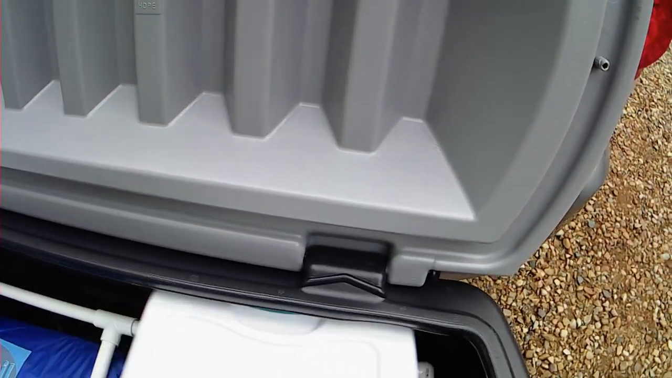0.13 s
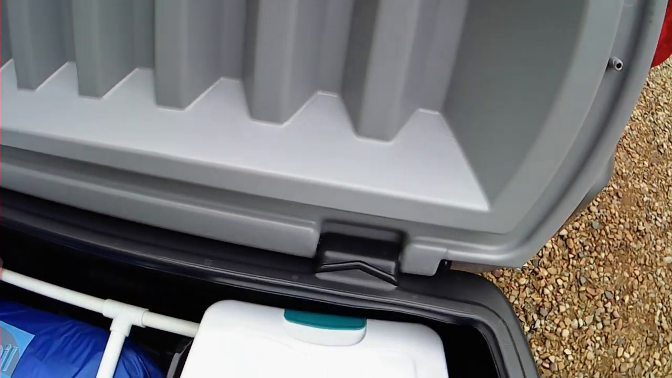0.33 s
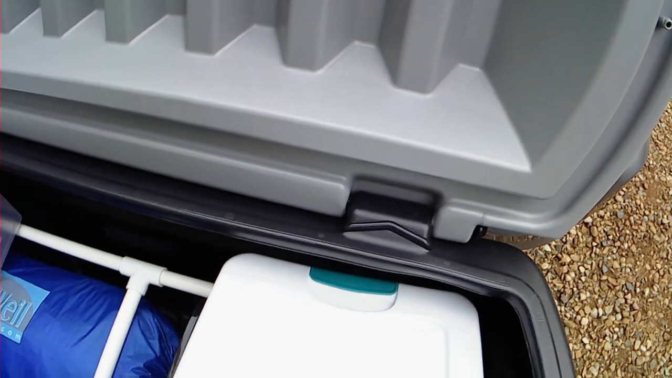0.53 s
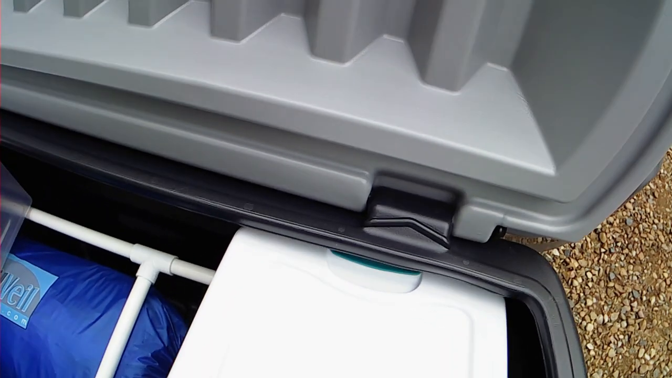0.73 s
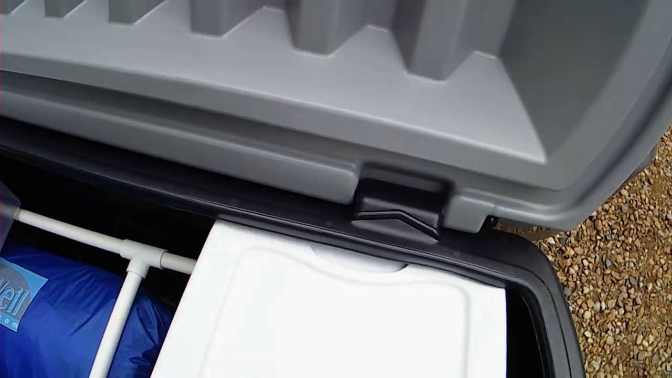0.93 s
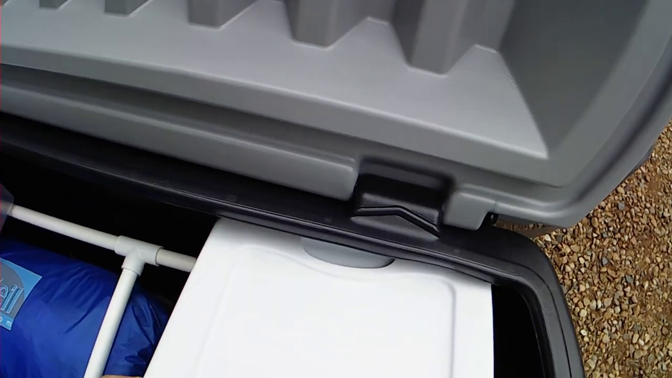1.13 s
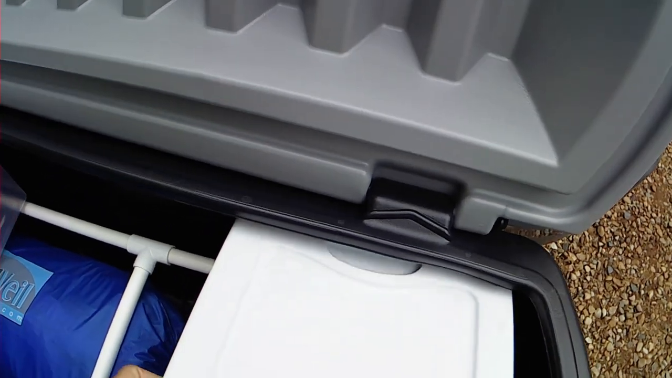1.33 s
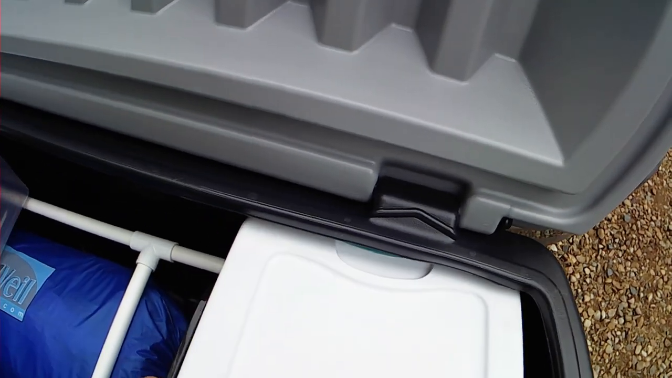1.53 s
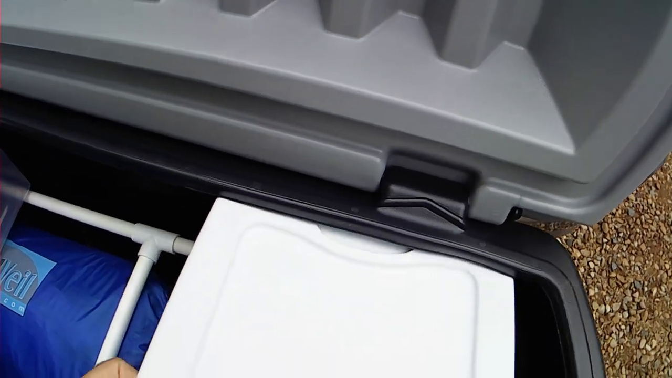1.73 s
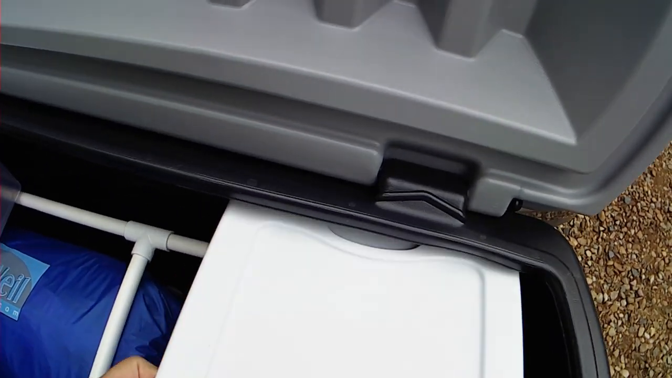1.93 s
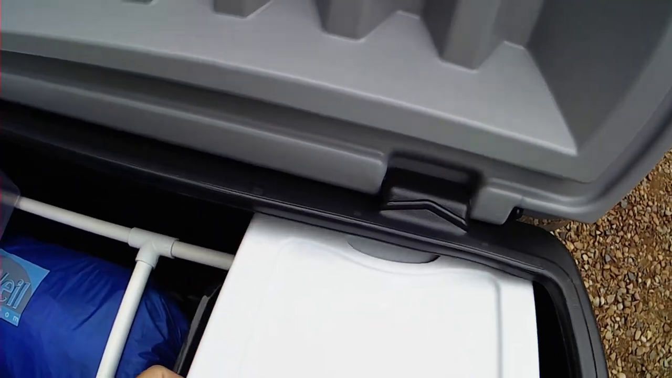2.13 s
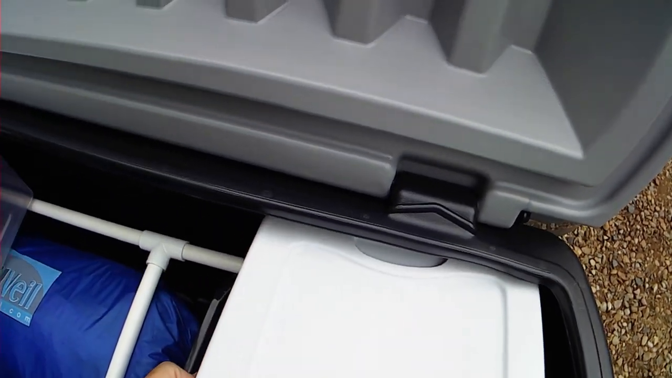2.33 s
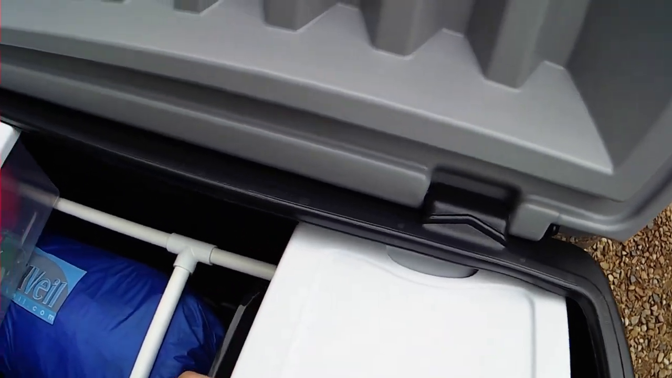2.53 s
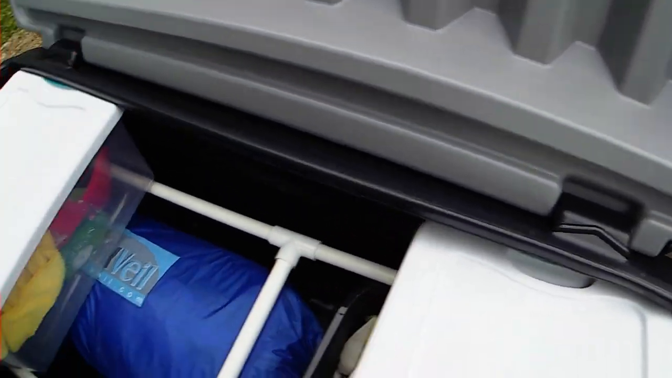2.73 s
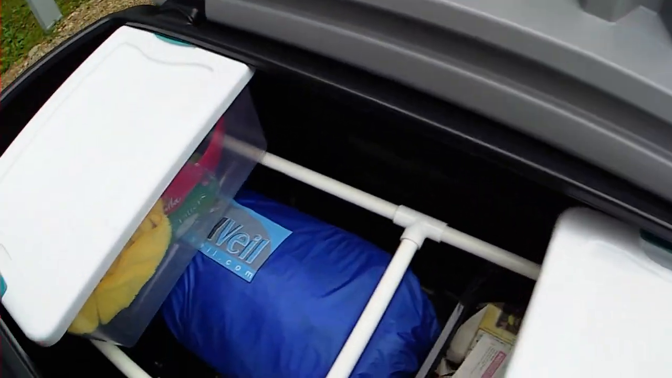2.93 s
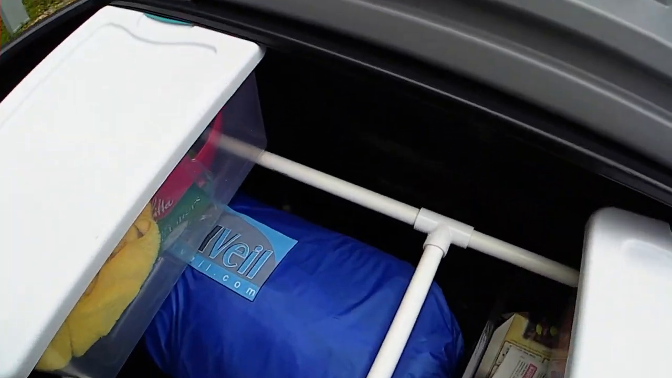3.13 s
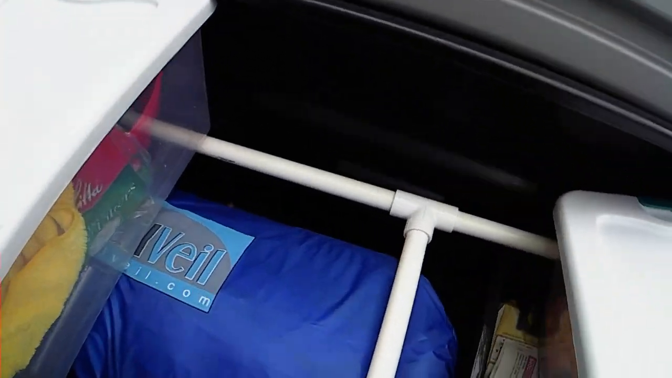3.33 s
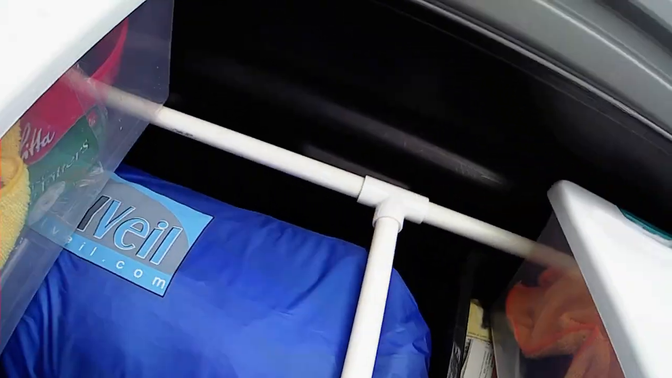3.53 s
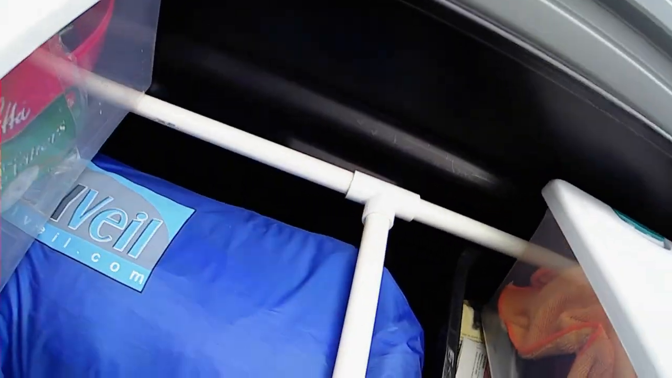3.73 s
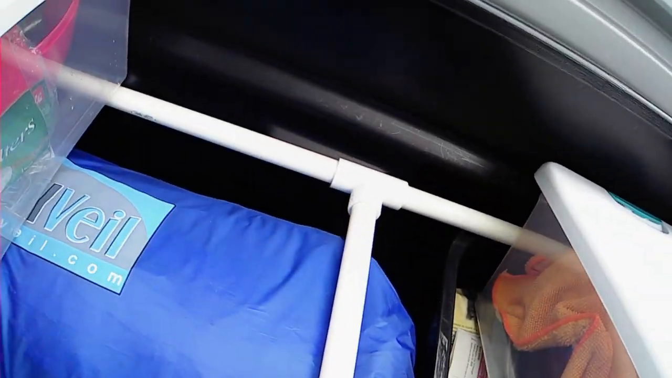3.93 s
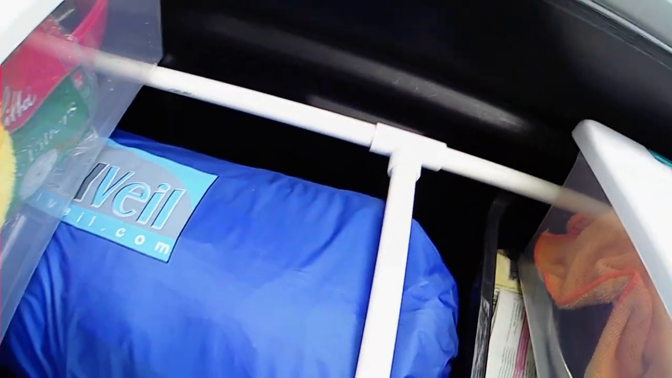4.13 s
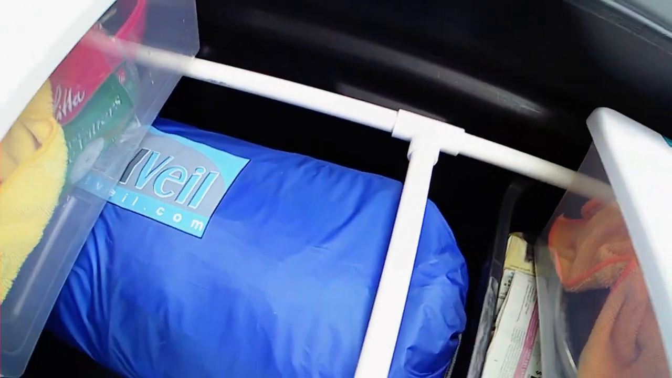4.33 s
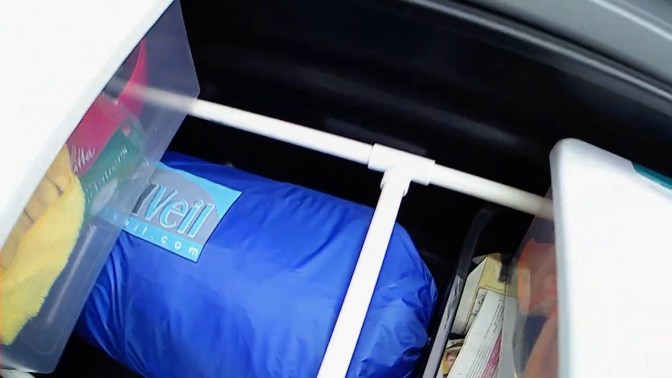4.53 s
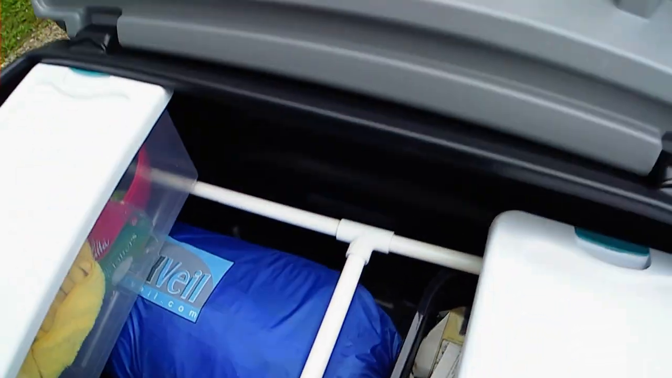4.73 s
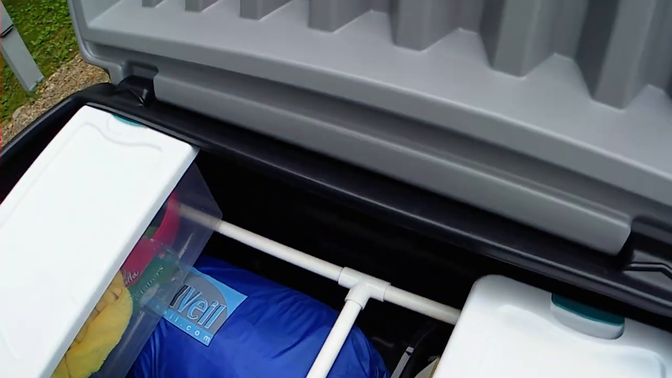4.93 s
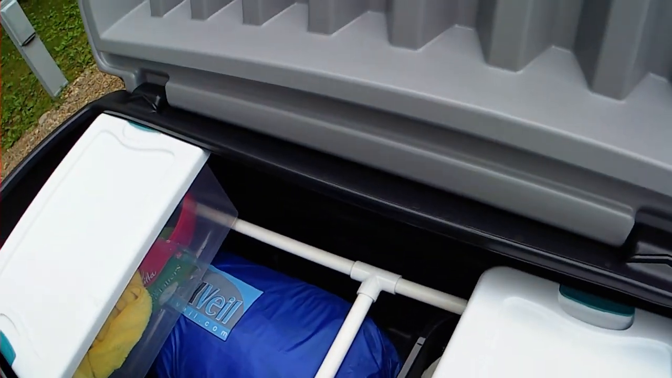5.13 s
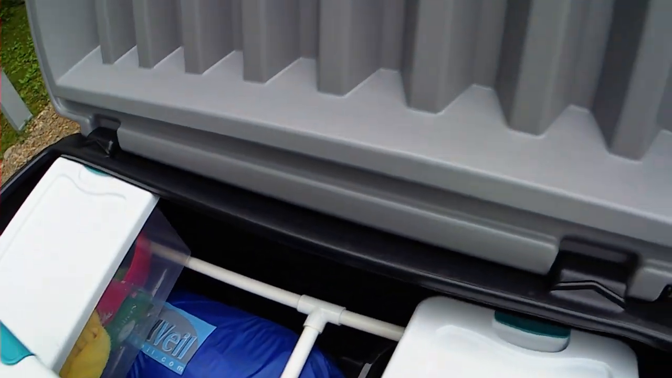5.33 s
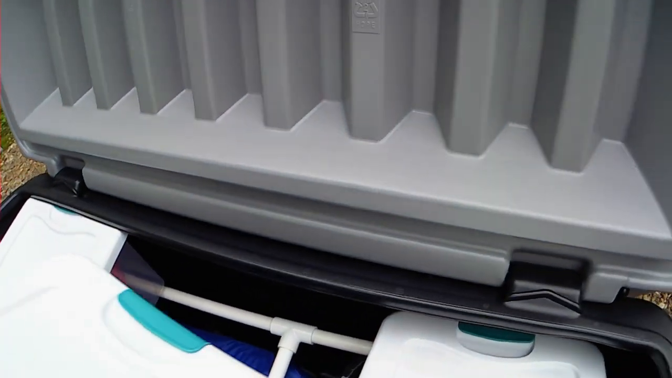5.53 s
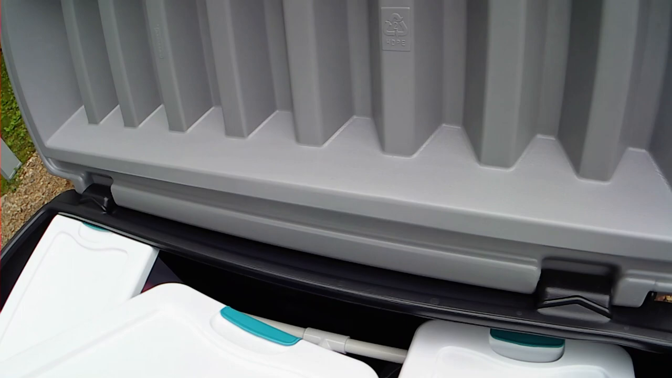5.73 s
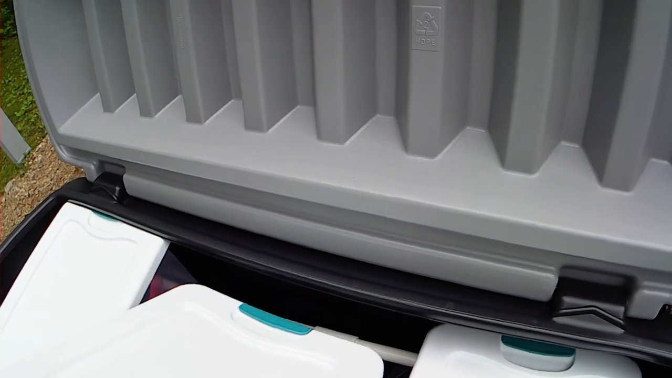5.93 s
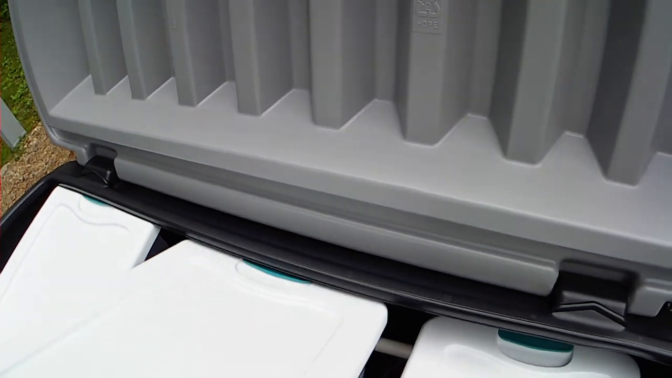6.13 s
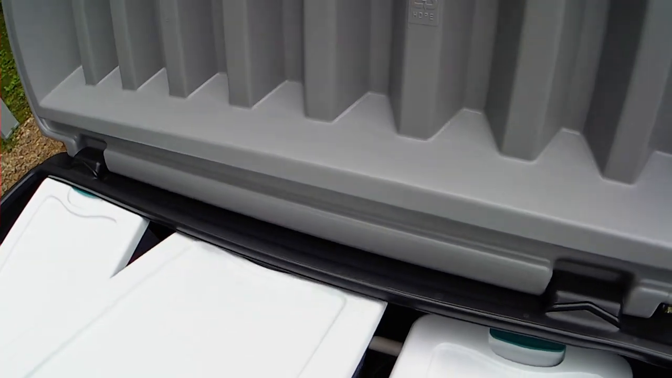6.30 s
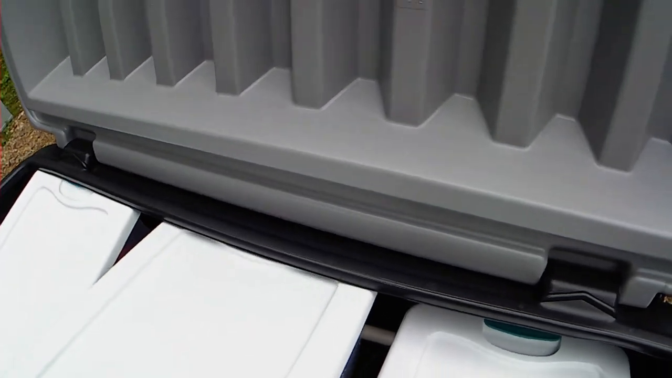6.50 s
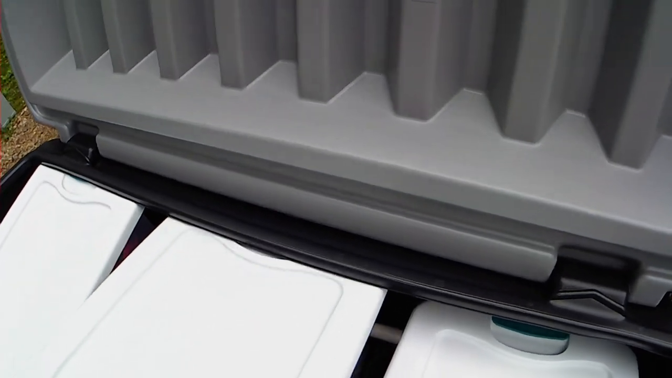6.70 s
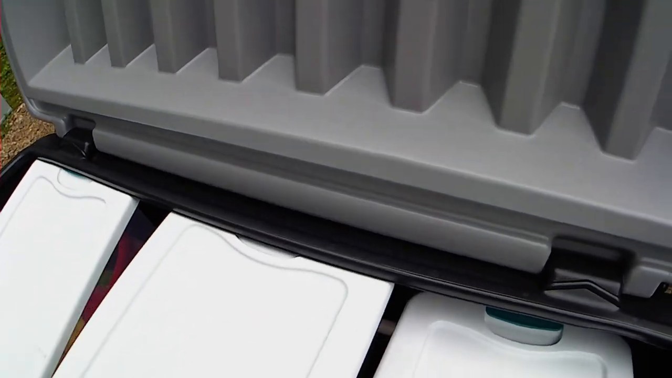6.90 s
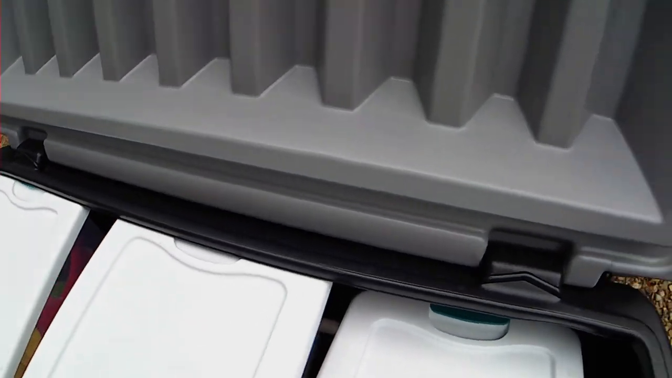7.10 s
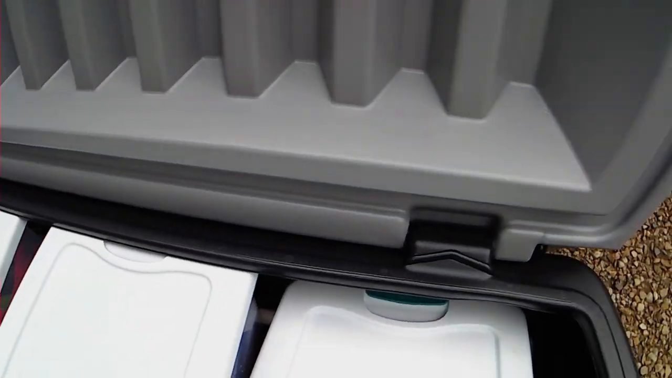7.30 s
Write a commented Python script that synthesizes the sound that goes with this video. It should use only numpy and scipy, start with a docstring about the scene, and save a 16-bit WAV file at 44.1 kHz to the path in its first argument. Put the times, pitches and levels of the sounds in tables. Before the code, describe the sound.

Outdoors, close to a small camera microphone, plastic totes are fitted into a big hollow plastic cargo box. From 0 to 0.5 s a busy tumble of heavy, boomy knocks, clacks and short rasps, strongest around 0.1-0.25 s. Another hard double thump lands at 0.85 s, with looser knocks until about 1.05 s. Small clacks at 1.35 and 1.7 s lead to a firm, damped thud at 1.8 s and softer bumps near 2 s with a tiny squeak. It is then nearly quiet until a brighter, ringing clatter with a rasp at 3.45-3.55 s, trailing into faint taps and rubbing by 4.3 s. Quiet air, low hiss and a barely audible thin high whine remain. At 5.9 s sliding and a brief squeal begin; moderate hollow knocks come at 6.2 and 6.4 s, then a quick cluster at 6.8-7 s, and a last light knock at 7.3 s.

```python
"""Outdoors, close to a small camera: plastic storage totes are slid and knocked into a big plastic cargo box.
Contacts clack in the thin walls and boom in the hollow shell: noise tails and decaying modes, coloured per contact.
Sliding is a stream of tiny slip impulses ringing the tote; filtered noise bursts rasp, rims ring, two squeals glide.
Behind lie quiet outdoor air (shaped noise) and the camera's faint pulsing whine (a sine and narrow noise)."""
import sys
import numpy as np
from scipy import signal
from scipy.fft import rfft, irfft, next_fast_len
from scipy.io import wavfile

SR = 44100
rng = np.random.default_rng(int(sys.argv[2]) if len(sys.argv) > 2 else 0)


def generate_wav(signal):
    """Clip the signal to [-1, 1] and save it as 16-bit WAV at the path in sys.argv[1]."""
    frames = np.transpose(np.atleast_2d(signal))
    scaled = np.clip(frames, -1, 1) * 32767
    pcm = np.round(scaled).astype(np.int16)
    wavfile.write(sys.argv[1], SR, pcm)


N = 324567

# contacts: (time [s], box thump in the attack [dB], wall clack in the attack before colour [dB],
# hardness [dB/octave], damping [dB], negative = none)
KNOCKS = [(0.012, -24, -54.5, 8, 10), (0.044, -26.5, -43, 0, -2), (0.109, -16, -35.5, -0.5, 4),
          (0.193, -21, -27, 2.5, -0.5), (0.211, -14.5, -33, 1.5, -5), (0.233, -26, -36.5, 0, 5),
          (0.245, -32, -43.5, 1.5, -1), (0.262, -31, -45, -0.5, 7), (0.286, -31, -44, -10, -1),
          (0.309, -42, -54, 6, 5), (0.328, -43, -50, -6, 4), (0.376, -37, -39.5, 0, 1.5),
          (0.443, -33, -52, -4, -2), (0.5059, -40, -30.5, 4.5, 5.5), (0.631, -50, -51.5, 0.5, 11),
          (0.807, -31, -56, 1, 6), (0.837, -17, -26.5, 3, 7.5), (0.862, -27, -32, 0, -9),
          (0.869, -14.5, -24.5, 1, 3), (0.889, -28.5, -40.5, -3.5, -2.5), (0.912, -34, -43, -2, 5),
          (0.937, -42, -51.5, 4, 9), (0.942, -26, -56, -7, 7), (0.985, -18.5, -29.5, -4.5, 15.5),
          (1.003, -28.5, -43, 0, 4), (1.021, -29.5, -47, -1, 0), (1.122, -49, -65.5, 6, -12),
          (1.344, -30, -38, 2, 2.5), (1.37, -34.5, -44.5, 3, 0.5), (1.532, -44, -68, 5, -3),
          (1.678, -28, -29.5, 0, 3.5), (1.7, -33, -34, 0, 3), (1.763, -35, -35.5, -7, 10),
          (1.786, -17, -26, 2.5, 10.5), (1.793, -18, -31.5, -8.5, 2), (1.805, -26, -43, -0.5, 1),
          (1.828, -29, -42, -1.5, -5), (1.951, -35.5, -44.5, -0.5, -4), (1.96, -21, -37.5, -4, 8.5),
          (1.998, -33, -42, 0.5, 3.5), (2.025, -32.5, -50, 2.5, -3.5), (2.043, -37, -60, 8, -4),
          (2.112, -57, -53.5, 1, 6), (2.616, -55, -62.5, 7.5, -10), (3.037, -56.5, -54.5, -3, 5),
          (3.278, -56, -45.5, 2, -5), (3.319, -29, -42, -1.5, -2.5), (3.426, -46, -46, 8, 6),
          (3.4374, -24, -28, 5.5, 1), (3.452, -22.5, -24, 2, -1), (3.459, -24.5, -22.5, 3, 3.5),
          (3.471, -19, -32.5, 2, 4), (3.486, -24.5, -33.5, 2.5, 2.5), (3.503, -38, -37, 0, 2),
          (3.533, -30, -37, -4, -2), (3.551, -33.5, -35.5, -3.5, 0), (3.635, -41, -52, 1.5, -4),
          (3.657, -42, -55, 0, 5), (3.711, -44, -50, -0.5, -5), (3.847, -52, -57, 0.5, 1),
          (4.045, -54, -56.5, -2.5, 10), (4.107, -62, -60, -5, 5), (4.128, -56, -54, -8, 6),
          (4.172, -55, -65, -5, -2), (4.229, -60, -52.5, -1, 0), (4.817, -76, -56.5, 1, 5),
          (5.129, -72.5, -59.5, -3, 4), (5.255, -67.5, -54, -5, 2), (5.356, -68, -55.5, 3.5, 5.5),
          (5.667, -78, -54, 1.5, 5), (5.899, -38, -48.5, 4.5, -5), (5.953, -36, -47.5, -2.5, -5),
          (6, -50, -51, -4.5, 2), (6.181, -29, -33.5, 0, 5.5), (6.189, -28.5, -38, -1, -3),
          (6.205, -37, -36, -6.5, -4), (6.306, -29, -44, 2.5, 7), (6.349, -36, -52, 0.5, -5),
          (6.378, -46, -43, 0.5, -5), (6.414, -39, -39, -3.5, -2), (6.565, -47, -54.5, 0.5, -1),
          (6.691, -37.5, -48.5, 3.5, 6), (6.703, -33, -53, 4, 4.5), (6.755, -34.5, -41.5, 0.5, 0.5),
          (6.811, -25, -35, 5.5, 1.5), (6.82, -26, -33.5, -1, 0), (6.852, -32, -44.5, 2, -2),
          (6.868, -27, -42, -0.5, -0.5), (6.883, -37, -47.5, 6, -2), (6.906, -38, -37, 2, -2),
          (6.919, -29, -45, 5, 7), (6.923, -21.5, -35, 3.5, 2), (6.935, -26, -29.5, 1.5, 3.5),
          (6.946, -34, -36, 0.5, 9), (6.956, -26.5, -46.5, -6, 3), (6.971, -41, -39, -0.5, 3),
          (7.018, -51, -46, 2.5, 7), (7.028, -40, -47.5, -8, 4), (7.082, -38, -43.5, -0.5, -5),
          (7.193, -41, -49.5, -1, 0), (7.317, -27, -42, 2, 4.5)]
# thump band, then clack bands: edges [Hz]
BAND_EDGES_HZ = [70, 420, 1100, 3000, 7000, 12500]
# broad response of the plastic: (frequency [Hz], level [dB])
PLASTIC = [(25, -46.5), (45, -21.5), (62, -23.5), (85, -6), (140, -5), (176, -5), (220, 0), (350, -1),
           (480, -4.5), (680, -2.5), (920, -6.5), (1550, -0.5), (2900, -21), (4000, -29.5), (5200, -40),
           (12000, -54.5)]
# flutter of the walls after a blow: (frequency [Hz], t60 [s])
FLUTTER = [(100, 0.26), (400, 0.092), (1500, 0.2), (5000, 0.011), (11000, 0.038)]
# ring of the hollow box: (frequency [Hz], t60 [s])
HOLLOW = [(80, 0.97), (210, 0.38), (560, 0.18), (1500, 0.24), (4000, 0.033), (10000, 0.089)]
# colour of a slip: (frequency [Hz], level [dB])
SLIP = [(25, -18.5), (50, -13.5), (100, 0.5), (230, 1), (480, -0.5), (750, 3.5), (1100, 2.5), (1600, -2.5),
        (2700, -18.5), (4200, -21), (6000, -35), (12000, -60)]
# spectrum of outdoor air and hiss: (frequency [Hz], relative level [dB])
AIR = [(15, -79), (25, -6.5), (99, -15), (171, -27), (200, 8), (273, -13.5), (346, 2), (425, -7), (510, -1),
       (836, -23.5), (1410, -13.5), (2430, -16), (5880, -23), (12500, -26.5), (16200, -52), (22000, -120)]
# modes of each tote as it lies in the shell: (frequency [Hz], relative level [dB], t60 [s])
RIGHT_TOTE = [(86, 2, .7), (138, 6, .4), (152, 7, .55), (208, 10, .28), (220, 11, .28), (290, 3, .35),
              (340, 6, .3), (372, 4, .25), (450, 2, .3), (533, 2, .2), (592, 10, .2), (635, 5, .25),
              (665, 5, .16), (735, 7, .18), (810, 11, .18), (1026, 2, .2), (1155, 7, .15), (1355, 5, .16),
              (1438, 8, .13), (1490, 9, .14), (1650, 8, .14), (1950, 6, .12), (2088, 9, .14), (2530, 6, .2),
              (2647, 8, .1), (2850, 4, .12), (3919, 2, .1), (4150, 3, .1), (7100, 9, .035), (7700, 9, .035)]
LEFT_TOTE = [(138, 11, .35), (166, 11, .5), (212, 6, .3), (361, 5, .5), (506, 3, .33), (678, 2, .3),
             (1034, 13, .3), (1136, 7, .25), (1179, 7, .3), (1270, 7, .3), (1405, 12, .28), (1470, 13, .24),
             (1502, 10, .17), (1615, 4, .33), (1663, 5, .29), (1803, 7, .25), (2040, 9, .28),
             (2277, 6, .35), (2552, 22, .42), (3015, 11, .14), (3219, 15, .3), (3685, 16, .2),
             (3830, 17, .22), (3940, 17, .3), (4377, 17, .26), (4680, 18, .2)]
MIDDLE_TOTE = [(98, 8, 0.3), (119.5, 8.6, 0.2), (140.7, 20, 0.48), (218, 3.9, 0.26), (253.6, 17.8, 0.32),
               (317.2, 11, 0.69), (415, 2.6, 0.31), (592, 12, 0.32), (635, 8.8, 0.11), (707, 14, 0.12),
               (747, 9.7, 0.088), (820, 8.9, 0.09), (908, 14.2, 0.073), (1113, 11.8, 0.038),
               (1256, 11, 0.077), (1340, 6.8, 0.058), (1393, 12, 0.057), (1498, 5.2, 0.065),
               (1685, 12, 0.021), (1980, 4.4, 0.17), (2150, 6.8, 0.14), (2500, 5.4, 0.12),
               (2760, 10, 0.033), (3820, 5.8, 0.048), (4500, 5.4, 0.11)]
# a rim catches and rasps: (time [s], length [s], centre [Hz], rms before the stroke [dB])
RIM_RASPS = [(0.0442, 0.0067, 1580, -22.5), (0.028, 0.014, 1250, -40), (0.03, 0.024, 2370, -47),
             (0.192, 0.014, 1700, -22.5), (0.208, 0.071, 1050, -36.5), (0.21, 0.06, 2980, -50.5),
             (0.297, 0.11, 1340, -56), (0.838, 0.044, 890, -30), (0.862, 0.014, 2300, -36.5),
             (0.998, 0.013, 2074, -45), (1.368, 0.012, 1590, -36.5), (1.677, 0.01, 1780, -28),
             (1.698, 0.013, 1790, -31), (1.758, 0.0077, 1660, -35.5), (1.785, 0.0052, 1560, -15.5),
             (3.438, 0.0082, 940, -30.5), (3.452, 0.016, 1480, -21.5), (3.532, 0.059, 1260, -36.5),
             (3.528, 0.07, 2150, -48), (4.356, 0.49, 674, -66.5), (6.066, 0.15, 1150, -57),
             (6.09, 0.32, 726, -46), (6.176, 0.06, 2350, -44.5), (6.393, 0.086, 613, -38),
             (6.383, 0.015, 2500, -59), (6.405, 0.035, 2360, -49), (6.914, 0.039, 1980, -41),
             (6.935, 0.0057, 1110, -32)]
# a rubbing wall squeals: (time [s], length [s], from [Hz], to [Hz], rms before the swell [dB])
SQUEALS = [(2.002, 0.035, 890, 920, -45), (5.97, 0.053, 793, 858, -45.5)]
# pushes that slide a tote: (time [s], length [s], box rumble [dB], edge rasp [dB])
PUSHES = [(0, 0.043, -30.5, -40), (0.088, 0.091, -46, -43), (0.201, 0.04, -32, -39.5),
          (0.287, 0.023, -37.5, -39), (0.404, 0.13, -44, -56), (0.544, 0.14, -54, -66),
          (0.733, 0.091, -53.5, -60), (0.844, 0.029, -44.5, -44), (1.417, 0.7, -60.5, -65),
          (1.67, 0.094, -38, -53), (1.984, 0.04, -43, -59), (2.457, 0.22, -67, -66.5),
          (3.077, 0.043, -56, -60), (3.155, 0.1, -60.5, -60.5), (3.357, 0.068, -48, -52),
          (3.436, 0.017, -39.5, -28), (3.469, 0.075, -41.5, -39), (3.61, 0.046, -44.5, -55),
          (3.945, 0.14, -59.5, -65.5), (4.096, 0.13, -53, -61.5), (4.353, 0.16, -80, -67.5),
          (5.899, 0.085, -38.5, -50.5), (5.983, 0.25, -49, -50.5), (6.188, 0.027, -30, -40),
          (6.372, 0.038, -37.5, -46), (6.59, 0.13, -48.5, -57.5), (6.783, 0.12, -37, -47),
          (6.888, 0.022, -33, -36), (6.958, 0.08, -39.5, -52), (7.334, 0.038, -60, -49)]
# clack colour of each tote at hardness 0: (frequency [Hz], level [dB])
RIGHT_CLACK = [(680, 1), (1800, -10.5), (4600, -17), (9400, -37)]
LEFT_CLACK = [(680, -3.5), (1800, -11.5), (4600, -19), (9400, -46.5)]
MIDDLE_CLACK = [(680, 2.5), (1800, -7.5), (4600, -15.5), (9400, -44)]
# how strongly each tote's modes stand out of the flutter
RIGHT_RING_DB, LEFT_RING_DB, MIDDLE_RING_DB = -0.5, -3, 0.5
# edge slips per second: sparse slips rattle, dense ones hiss
RIGHT_SLIP_RATE, LEFT_SLIP_RATE, MIDDLE_SLIP_RATE = 170, 140, 500
# tote handled: (from [s], to [s], modes, clack colour, ring [dB], slip rate [1/s])
TURNS = [(0, 2.9, RIGHT_TOTE, RIGHT_CLACK, RIGHT_RING_DB, RIGHT_SLIP_RATE),
         (2.9, 5.8, LEFT_TOTE, LEFT_CLACK, LEFT_RING_DB, LEFT_SLIP_RATE),
         (5.8, 7.4, MIDDLE_TOTE, MIDDLE_CLACK, MIDDLE_RING_DB, MIDDLE_SLIP_RATE)]
# light taps on a stiff rim: (time [s], level [dB], pitch favoured by the spot [Hz])
TAPS = [(1.122, -50.5, 1470), (3.709, -40, 1460), (4.228, -61.5, 2700), (6.729, -54, 1600),
        (7.078, -41.5, 1794), (7.191, -48.5, 1800)]
# modes of a rim: (frequency [Hz], relative level [dB], t60 [s])
RIM = [(1230, -1, 0.1), (1460, -2.5, 0.046), (1760, -4, 0.097), (1820, -1, 0.053), (2710, -0.5, 0.056)]
# treble loss of the microphone: (frequency [Hz], level [dB])
MICROPHONE = [(9500, -0.5), (11000, -2), (12700, -5)]

AIR_DB, TOP_HZ = -68.5, 12750
RING_SIZE, FFT_SIZE, ATTACK_SIZE = 24000, 32768, 706  # samples; the attack is 16 ms
PIVOT_HZ = 1127  # hardness tilts the clack about this pitch
# damping: onset time, and the share of its loss that the boom takes too, fading out up to KNOCK_HZ
CHOKE_S, KNOCK_HZ, BOOM_HZ, BOOM_LOSS_SHARE = 0.013, 249, 132, 0.91
# a push grips fast and presses harder up to its end; then the edge falls silent sooner than the box
GRIP_S, PRESS_DB, RUMBLE_FALL_DB_PER_S, RASP_FALL_DB_PER_S = 0.0011, 2, 170.5, 275
# between pushes the hands keep the totes stirring faintly
STIR_RUMBLE_DB, STIR_RASP_DB = -72, -70


def amp(db):
    """Decibels to gain."""
    return 10 ** (np.asarray(db) / 20)


def unit(x):
    """Scale to rms 1."""
    return x / np.sqrt(np.mean(x ** 2) + 1e-20)


def along(points, hz):
    """Read (Hz, value) points on a log axis."""
    f, v = np.transpose(points)
    return np.interp(np.log(hz + 1), np.log(f + 1), v)


def filtered(x, gain):
    """Zero-phase filter; gain is a function of frequency."""
    m = next_fast_len(N + SR // 2)
    return irfft(rfft(x, m) * gain(np.fft.rfftfreq(m, 1 / SR)), m)[:N]


def coloured(x, points):
    """Minimum-phase filter through (Hz, dB) points, for one short sound."""
    cepstrum = irfft(np.log(amp(along(points, np.fft.rfftfreq(FFT_SIZE, 1 / SR)))))
    # fold to causal
    cepstrum[1:FFT_SIZE // 2] *= 2
    cepstrum[FFT_SIZE // 2 + 1:] = 0
    response = np.exp(rfft(cepstrum))
    return irfft(rfft(x, FFT_SIZE) * response)[:len(x)]


def air():
    """Steady, quiet outdoor air with microphone hiss: shaped noise."""
    noise = rng.standard_normal(N)
    return amp(AIR_DB) * unit(filtered(noise, lambda hz: amp(along(AIR, hz))))


def whine(pitch_hz=5992, width_hz=70, tone_db=-89, fuzz_db=-86, pulse_hz=50, depth=1.0):
    """Camera electronics sing a thin, fuzzy, rapidly pulsing note; levels are before the pulsing."""
    t = np.arange(N) / SR
    noise = rng.standard_normal(N)
    fuzz = unit(filtered(noise, lambda hz: 1 / (1 + ((hz - pitch_hz) / width_hz) ** 2)))
    tone = np.sqrt(2) * np.sin(2 * np.pi * pitch_hz * t)
    pulse = 1 + depth * np.sin(2 * np.pi * pulse_hz * t)
    return (amp(tone_db) * tone + amp(fuzz_db) * fuzz) * pulse


def dying_noise(decay, count):
    """count noise tails of energy about 1; each frequency dies at its own speed."""
    hz, t, z = signal.stft(rng.standard_normal((count, RING_SIZE)), SR, nperseg=256)
    fade = amp(-60 * t / along(decay, hz)[:, None])
    fade /= np.sqrt(np.mean(fade ** 2, axis=1, keepdims=True) * RING_SIZE)
    return signal.istft(z * fade, SR, nperseg=256)[1][:, :RING_SIZE]


def dispersed(x, delay_s, scatter=0.305):
    """Bending waves in a thin wall carry highs faster than lows; delay_s is the median travel time at 1 kHz."""
    hz = np.fft.rfftfreq(FFT_SIZE, 1 / SR)
    travel_s = delay_s * np.exp(scatter * rng.standard_normal((len(x), 1)))
    phase = np.exp(-4j * np.pi * travel_s * np.sqrt(1000 * hz))
    return irfft(rfft(x, FFT_SIZE) * phase)[:, :RING_SIZE]


def box_answers(tote, count, flutter_db, hollow_db, modes_db, crunch_db,
                spread_db=2, crunch_t60_s=0.058, crunch_hz=1500, rise_s=0.00072):
    """A tote struck at count places: push, edge crunch, wall flutter, hollow ring and modes."""
    t = np.arange(RING_SIZE) / SR
    hz, db, t60_s = np.transpose(tote)[:, :, None]
    damping = np.log(1000) / t60_s
    mode_gain = amp(db + modes_db) * 2 * damping / SR
    modes = mode_gain * np.exp(-damping * t) * np.cos(2 * np.pi * hz * t)
    favour = amp(spread_db * rng.standard_normal((count, len(hz))))  # each place favours other modes
    ring = favour @ modes
    walls = amp(flutter_db) * dying_noise(FLUTTER, count) + amp(hollow_db) * dying_noise(HOLLOW, count)
    # plastic yields: the push carries the lows, the landing edge grinds out the treble
    lowpass = signal.butter(1, crunch_hz, fs=SR, output='sos')
    highpass = signal.butter(1, crunch_hz, 'high', fs=SR, output='sos')
    push = signal.sosfilt(lowpass, signal.unit_impulse(RING_SIZE))
    grind = signal.sosfilt(highpass, dying_noise([(crunch_hz, crunch_t60_s)], count))
    onset = 1 - np.exp(-t / rise_s)
    crunch = amp(crunch_db) * grind * onset
    driven_ring = signal.fftconvolve(ring, crunch, axes=1)[:, :RING_SIZE]  # grinding drives the upper modes
    return dispersed(push + ring, delay_s=0.000901) + walls * onset + crunch + driven_ring


def slips(rate, spread_db, jerk_rate, jerk_db):
    """Irregular stick-slip impulses of uneven size, their strength swaying in little jerks."""
    knots = rng.standard_normal(N // 100)
    jerks = np.interp(np.arange(N) * jerk_rate / SR, np.arange(len(knots)), np.clip(knots, -2, 2))
    happens = rng.random(N) < rate / SR
    size_db = spread_db * np.clip(rng.standard_normal(N), -2, 2) + jerk_db * jerks
    return happens * amp(size_db) * rng.choice([-1, 1], N)


def pushing(t):
    """Gains of rumble and rasp at times t: every push grips, presses harder and lets go."""
    rumble, rasp = amp(STIR_RUMBLE_DB), amp(STIR_RASP_DB)
    for s, length_s, rumble_db, rasp_db in PUSHES:
        grip = np.clip((t - s) / GRIP_S, 0, 1)
        press = grip * amp(PRESS_DB * np.clip((t - s) / length_s - 1, -1, 0))
        after_s = np.maximum(t - s - length_s, 0)
        rumble = np.maximum(rumble, press * amp(rumble_db - RUMBLE_FALL_DB_PER_S * after_s))
        rasp = np.maximum(rasp, press * amp(rasp_db - RASP_FALL_DB_PER_S * after_s))
    return rumble, rasp


def sliding(start_s, end_s, tote, ring_db, slip_rate, split_hz=480):
    """Slips at four contact points shake the tote: its load makes the box rumble, the rubbing edge rasps."""
    t = np.arange(N) / SR
    held = (t >= start_s) & (t < end_s)
    rumble_gain, rasp_gain = pushing(t[held])
    answers = box_answers(tote, count=4, flutter_db=0.0, hollow_db=-6.5, modes_db=ring_db - 10.5, crunch_db=10.5)
    rub = np.zeros(N)
    for answer in answers:
        impulses = slips(rate=slip_rate, spread_db=5.0, jerk_rate=90, jerk_db=4.0)
        rub += signal.oaconvolve(impulses, coloured(answer, SLIP))[:N]
    rumble = filtered(rub, lambda hz: 1 / (1 + (hz / split_hz) ** 6))
    rasp = rub - rumble
    sound = np.zeros(N)
    sound[held] = rumble_gain * unit(rumble)[held] + rasp_gain * unit(rasp)[held]
    return sound


def touches(start_s, end_s):
    """The knocks between two times."""
    return [knock for knock in KNOCKS if start_s <= knock[0] < end_s]


def damped(blow, damping_db):
    """A wall that stays pressed against what it hit loses its ring and its deep boom."""
    t = np.arange(RING_SIZE) / SR
    loss_db = max(damping_db, 0)
    choked = blow * amp(-loss_db * (1 - np.exp(-(t / CHOKE_S) ** 2)))
    return coloured(choked, [(BOOM_HZ, -BOOM_LOSS_SHARE * loss_db), (KNOCK_HZ, 0)])


def knocks(start_s, end_s, tote, clack, ring_db):
    """Heavy, soft contacts mostly thump; light, hard edges clack and snap."""
    contacts = touches(start_s, end_s)
    bands = list(zip(BAND_EDGES_HZ, BAND_EDGES_HZ[1:]))
    centres_hz = np.sqrt(np.prod(bands, axis=1))
    answers = box_answers(tote, len(contacts), flutter_db=6, hollow_db=0, modes_db=ring_db - 5.5, crunch_db=14.5)
    blows = np.array([damped(coloured(answer, PLASTIC), contact[-1])
                      for answer, contact in zip(answers, contacts)])
    attacks = [signal.sosfilt(signal.butter(3, band, 'band', fs=SR, output='sos'), blows[:, :ATTACK_SIZE])
               for band in bands]
    attack_db = 10 * np.log10(np.mean(np.square(attacks), axis=2)).T
    clack_hz = centres_hz[1:]
    out = np.zeros(N + RING_SIZE)
    for (s, thump_db, clack_db, hardness, _), blow, own_db in zip(contacts, blows, attack_db):
        walls_db = clack_db + along(clack, clack_hz) + hardness * np.log2(clack_hz / PIVOT_HZ)
        gain_db = np.append(thump_db, walls_db) - own_db  # bring each band's attack to its target
        out[max(0, round(s * SR)):][:RING_SIZE] += coloured(blow, list(zip(centres_hz, gain_db)))
    return out[:N]


def rim_rasps(width=0.14, swell=0.12):
    """A burst of friction rings one broad rim resonance (half-width in log Hz), swelling fast and fading."""
    out = np.zeros(N + SR)
    for s, length_s, hz, db in RIM_RASPS:
        edges_hz = [hz * np.exp(-width), hz * np.exp(width)]
        band = signal.butter(2, edges_hz, 'band', fs=SR, output='sos')
        rasp = unit(signal.sosfilt(band, rng.standard_normal(RING_SIZE))[:round(length_s * SR)])
        stroke = np.interp(np.linspace(0, 1, len(rasp)), [0, swell, 1], [0, 1, 0])
        out[round(s * SR):][:len(rasp)] += amp(db) * stroke * rasp
    return out[:N]


def rim_taps(reach_octaves=0.35, rise_s=0.001):
    """A tap rings the modes of the rim, most of all those near the pitch of the spot it hits."""
    t = np.arange(RING_SIZE) / SR
    hz, db, t60_s = np.transpose(RIM)[:, :, None]
    out = np.zeros(N + RING_SIZE)
    for s, level_db, spot_hz in TAPS:
        favour = np.exp(-(np.log2(hz / spot_hz) / reach_octaves) ** 2)
        decay = np.exp(-np.log(1000) * t / t60_s)
        ring = favour * amp(db) * decay * np.sin(2 * np.pi * (hz * t + rng.random(hz.shape)))
        onset = 1 - np.exp(-t / rise_s)
        out[round(s * SR):][:RING_SIZE] += amp(level_db) * ring.sum(axis=0) * onset
    return out[:N]


def squeals(waver=0.026, waver_hz=90, overtone_db=-14, swell=0.86):
    """Plastic rubbing on plastic briefly sings an unsteady, gliding note with one overtone."""
    out = np.zeros(N + SR)
    for s, length_s, from_hz, to_hz, db in SQUEALS:
        u = np.linspace(0, 1, round(length_s * SR))
        knots = rng.standard_normal(N // 100)
        unsteady = np.interp(u * length_s * waver_hz, np.arange(len(knots)), knots)
        pitch_hz = (from_hz + (to_hz - from_hz) * u) * (1 + waver * unsteady)
        phase = 2 * np.pi * np.cumsum(pitch_hz) / SR
        note = unit(np.sin(phase) + amp(overtone_db) * np.sin(2 * phase))
        out[round(s * SR):][:len(u)] += amp(db) * np.interp(u, [0, swell, 1], [0, 1, 0]) * note
    return out[:N]


def scene():
    """The three totes, one after another, over the quiet background."""
    background = air() + whine()
    totes = np.zeros(N)
    for start_s, end_s, tote, clack, ring_db, slip_rate in TURNS:
        totes += sliding(start_s, end_s, tote, ring_db, slip_rate)
        totes += knocks(start_s, end_s, tote, clack, ring_db)
    return (background + totes + rim_rasps() + rim_taps() + squeals())[None]


def record(dry):
    """The camera dulls the top and keeps nothing above its band limit."""
    def response(hz):
        return amp(along(MICROPHONE, hz)) * (hz < TOP_HZ)
    return np.array([filtered(channel, response) for channel in dry])


dry = scene()
out = record(dry)
generate_wav(out)
```